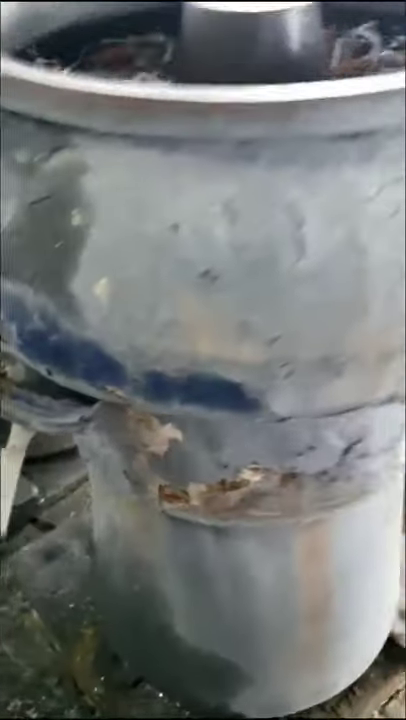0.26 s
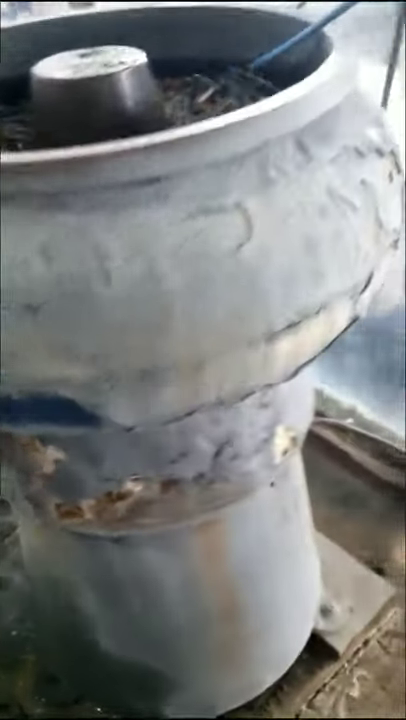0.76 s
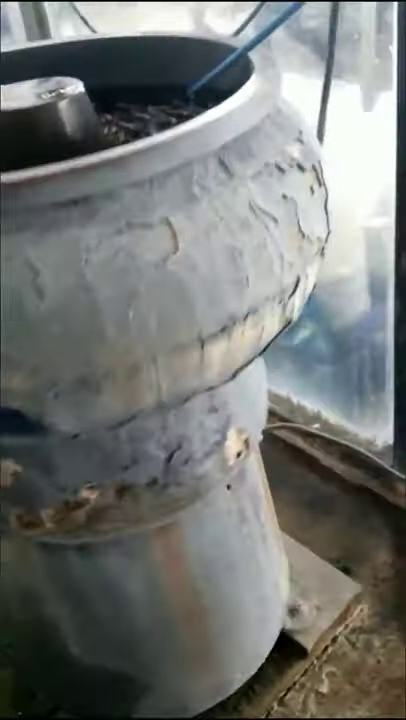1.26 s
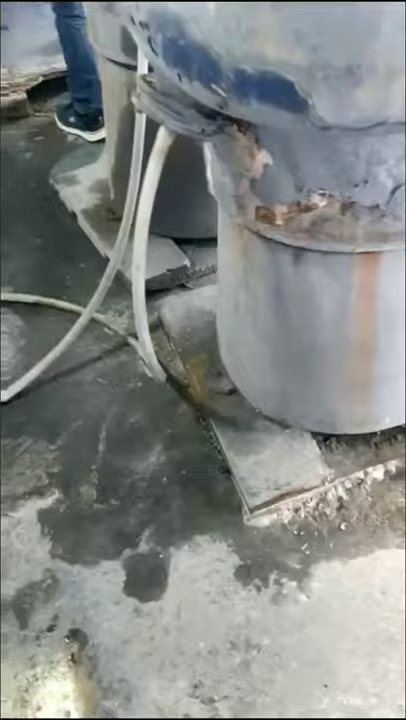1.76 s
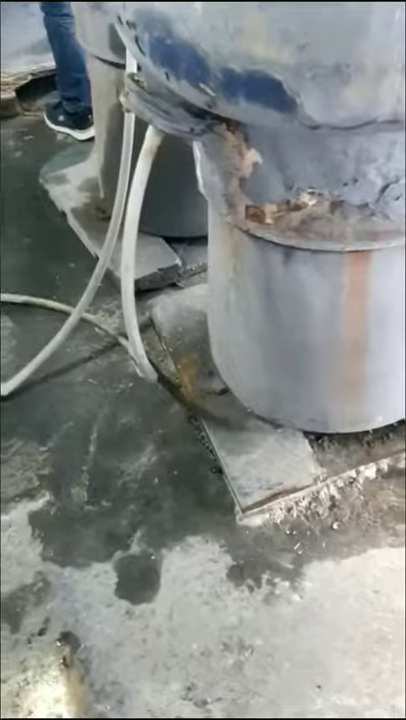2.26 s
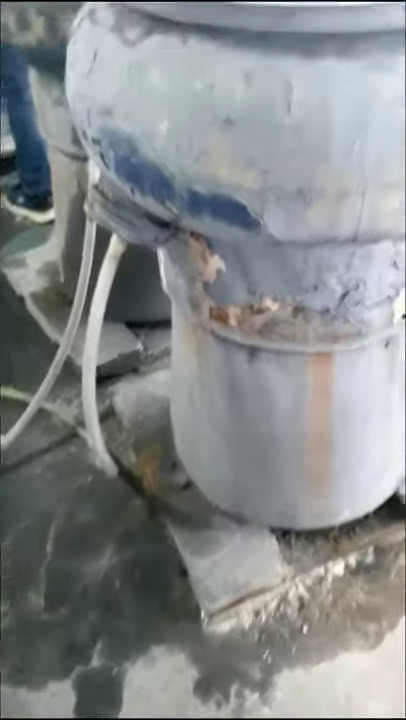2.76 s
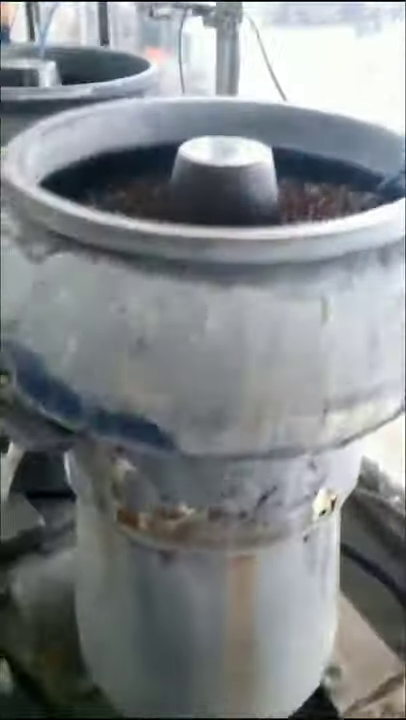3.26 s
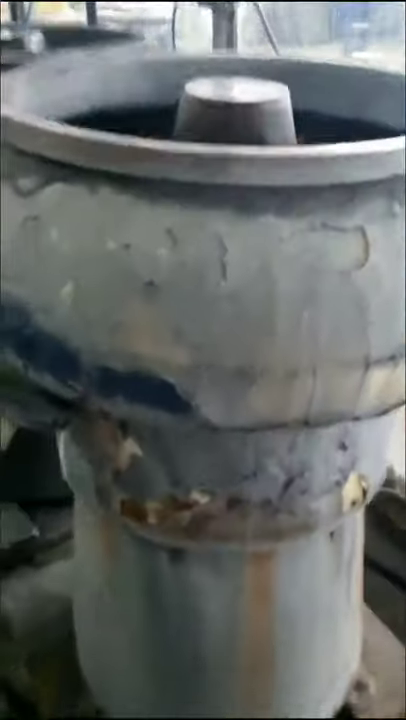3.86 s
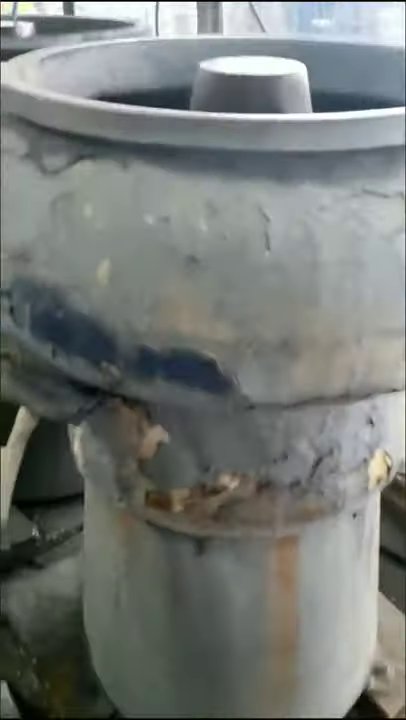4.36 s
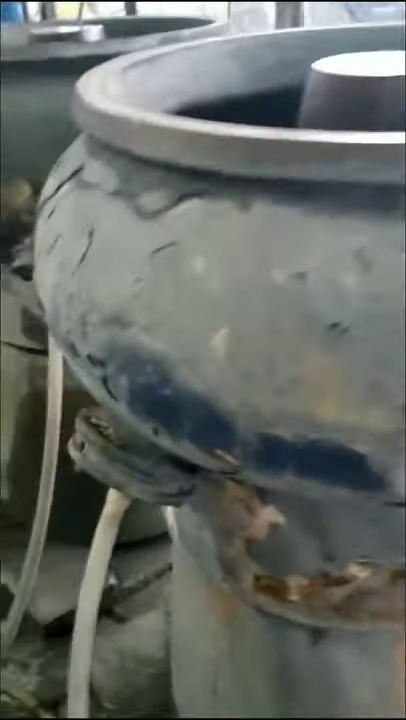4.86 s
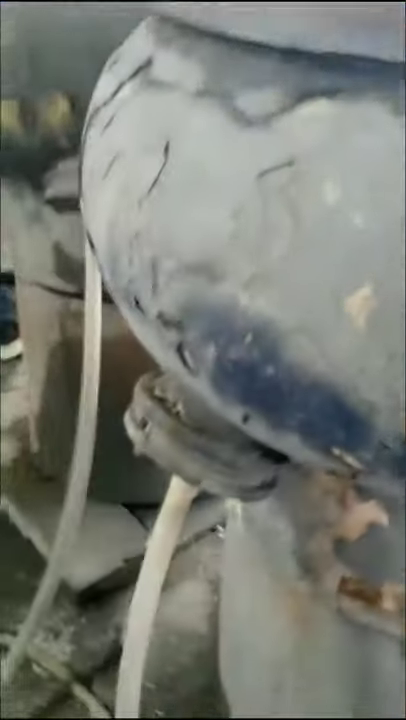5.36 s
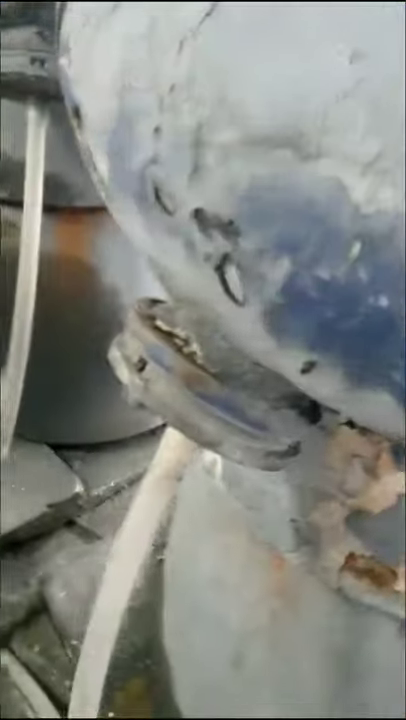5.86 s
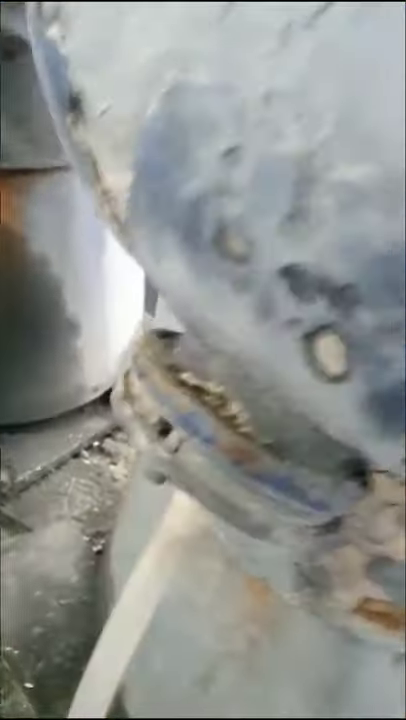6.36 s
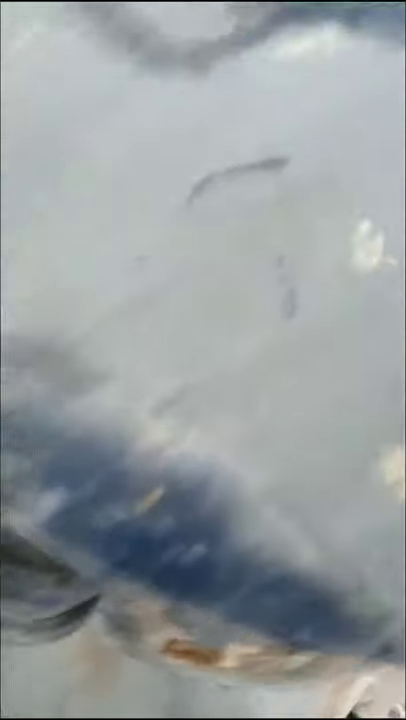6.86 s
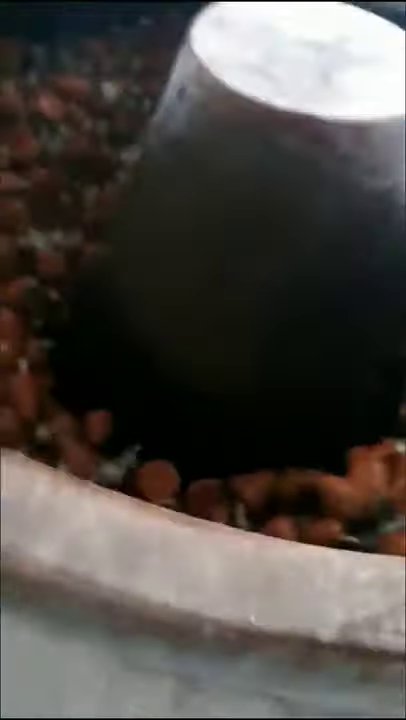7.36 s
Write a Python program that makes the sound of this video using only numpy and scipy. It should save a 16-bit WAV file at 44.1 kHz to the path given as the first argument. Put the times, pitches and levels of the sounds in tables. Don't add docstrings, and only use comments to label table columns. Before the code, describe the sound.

A vibratory polishing bowl runs with a dense, steady rushing rattle of chips and metal over a low wavering hum and dull irregular booms.

```python
import sys
import numpy as np
from scipy import signal
from scipy.fft import rfft, irfft, next_fast_len
from scipy.io import wavfile
from scipy.ndimage import uniform_filter1d

SR = 44100
rng = np.random.default_rng(int(sys.argv[2]) if len(sys.argv) > 2 else 0)


def gain_from_db(level_db):
    decades = np.asarray(level_db, float) / 20
    return 10 ** decades


def master_out(mix):
    frames = np.transpose(np.atleast_2d(mix))
    ceiling = np.clip(frames, -1, 1)
    pcm = np.round(ceiling * 32767).astype(np.int16)
    wavfile.write(sys.argv[1], SR, pcm)


N = 336042

CUT_S, RESUME_S = 1.4766, 1.6702
FRAME = 1024


def unit(x):
    return x / np.sqrt(np.mean(x ** 2))


def by_shot(pair):
    return np.where(np.arange(N) < (CUT_S + RESUME_S) / 2 * SR, *pair)


def walk(rate):
    hold = int(SR / rate)
    levels = np.repeat(rng.standard_normal(N // hold + 1), hold)
    return 1.38 * uniform_filter1d(uniform_filter1d(levels, hold), hold)[:N]


def shape(x, gain):
    size = next_fast_len(N)
    hz = np.arange(size // 2 + 1) * SR / size + 1e-3
    return irfft(rfft(x, size) * gain(hz), size)[:N]


def ring(hz, centre_hz, width_hz):
    return 1 / (1 + (2 * (hz - centre_hz) / width_hz) ** 2)


def colour(points, resonances):
    at, db = np.transpose(points)

    def gain(hz):
        base_db = np.interp(np.log(hz), np.log(at), db)
        return gain_from_db(base_db + sum(up_db * ring(hz, f, width) for f, width, up_db in resonances))
    return gain


def band(low_hz, high_hz):
    size = next_fast_len(N)
    spectrum = np.zeros(size // 2 + 1, complex)
    low, high = int(low_hz * size / SR), int(high_hz * size / SR)
    spectrum[low:high] = rng.standard_normal((high - low, 2)) @ [1, 1j]
    return unit(irfft(spectrum, size)[:N])


def bursts(rows, carriers=None):
    if carriers is None:
        carriers = [np.ones(N)] * len(rows)
    out = np.zeros(N)
    for (at, db, length), carrier in zip(rows, carriers):
        start = max(int((at - length / 2) * SR), 0)
        span = np.arange(start, min(int((at + length / 2) * SR), N))
        out[span] += gain_from_db(db) * np.cos(np.pi * (span / SR - at) / length) * carrier[span]
    return out


def phone_path():
    # (time [s], closeness to the shell [0-1], view over the rim [0-1])
    path = [
        (0, .1, 0.1),
        (1.45, .1, 0),
        (1.7, 0.1, 0),
        (3.0, 0.2, 0.2),
        (4.8, .3, 0.2),
        (6.2, 0.96, 0.03),
        (6.75, 1, 0),
        (7.05, .9, 0.6),
        (7.6, 1, 0.95),
    ]
    s, near, over = np.transpose(path)
    now = np.arange(N) / SR
    return np.interp(now, s, near), np.interp(now, s, over)


def hum(turn):
    # (first shot [dB], second shot [dB], neighbour share [0-1], in step at [s])
    multiples = [
        (-43, -42, 0.9, 4.7),
        (-43, -39, .8, 4.8),
        (-39.5, -40, 0.4, 3.9),
    ]
    close_db = [
        8,
        -0.5,
        -3.5,
    ]
    neighbour_slip_hz, first_in_step_s = 0.13, 0.46
    rim_db = -5
    s = np.arange(N) / SR
    near, over = phone_path()
    out = 0
    for k, (first_db, second_db, share, in_step_s) in enumerate(multiples):
        own = (k + 1) * turn + 0.23 * walk(0.93)
        slip = 2 * np.pi * (k + 1) * neighbour_slip_hz * (s - by_shot((first_in_step_s, in_step_s)))
        db = by_shot((first_db, second_db)) + close_db[k] * near + rim_db * over + 0.8 * walk(5)
        out = out + gain_from_db(db) * (np.sin(own) + share * np.sin(own - slip))
    for k, db in zip((4, 5, 6), (-48, -46, -44)):
        out = out + gain_from_db(db + 2.0 * walk(2.6)) * np.sin(k * turn)
    return np.sqrt(2) * out


def shell_mode(centre_hz, width_hz, swells, lulls_s, rest_db, near):
    noise = shape(rng.standard_normal(N), lambda hz: ring(hz, centre_hz, width_hz))
    mode = signal.hilbert(noise, next_fast_len(N))[:N]
    steadied = unit(np.real(mode / np.abs(mode) ** 0.8))
    lull_db = -11 * bursts([(at, 0, 0.12) for at in lulls_s])
    rest = gain_from_db(by_shot(rest_db) + 5 * near + 2 * walk(14))
    swell = bursts([(at, db, 1.43 * length) for at, db, length in swells])
    return np.hypot(rest, swell) * gain_from_db(lull_db) * steadied


def boom():
    # (time [s], level [dB], length [s])
    base_swells = [(0.14, -25, 0.07), (0.393, -30, 0.14), (0.628, -33.5, 0.19), (1.07, -47, 0.16),
                   (1.39, -35, 0.18), (1.704, -31, 0.07), (2.01, -29.5, 0.11), (2.356, -27.0, 0.12),
                   (2.726, -30, 0.14), (3.014, -33, 0.11), (3.163, -29, 0.12), (3.367, -27.0, 0.26),
                   (3.63, -30, 0.16), (4.0, -28, 0.06), (4.194, -26, 0.085), (4.415, -31, 0.1),
                   (4.574, -28, 0.13), (4.91, -34, 0.18), (5.163, -27, 0.13), (5.36, -30, 0.063),
                   (5.55, -39, 0.077), (5.73, -23, 0.044), (5.87, -32, 0.096), (6.25, -28, 0.28),
                   (6.56, -31.0, 0.11), (6.718, -35, 0.09), (6.854, -27, 0.13), (7.1, -28, 0.06),
                   (7.3, -32, 0.09), (7.472, -24, 0.079)]
    # (time [s], level [dB], length [s])
    bowl_swells = [(0.1, -25.5, .11), (.36, -26.5, 0.061), (.64, -29.5, .09), (.85, -34, 0.22),
                   (1.05, -30, 0.12), (1.29, -29, .07), (1.74, -27, 0.17), (1.91, -27, 0.09),
                   (2.07, -28.5, 0.11), (2.41, -26, 0.062), (2.51, -21.5, 0.068), (2.76, -31, 0.099),
                   (2.94, -23.5, 0.094), (3.25, -29, .15), (3.56, -29, 0.22), (4.04, -24, 0.047),
                   (4.25, -29.5, 0.18), (4.63, -22, 0.13), (4.97, -21.5, 0.084), (5.2, -23.5, .1),
                   (5.36, -28, 0.041), (5.73, -28, 0.09), (5.87, -20.5, .06), (5.96, -21, .06),
                   (6.54, -26, 0.09), (6.69, -22.5, 0.14), (6.89, -22, 0.14), (7.12, -19.5, 0.04),
                   (7.2, -19, 0.033), (7.31, -22, .092)]
    base_lulls_s = [.09, .2, .52, 1.84, 2.13, 2.85, 3.92, 4.78, 5.44, 6.0, 6.63, 7.03, 7.23]
    bowl_lulls_s = [.28, .52, 1.36, 2.3, 3.4, 3.72, 4.12, 4.82, 5.29, 6.06, 7.5]
    near, _ = phone_path()
    base = shell_mode(180, 14, base_swells, base_lulls_s, (-36.5, -38.5), near)
    bowl = shell_mode(232, 11.6, bowl_swells, bowl_lulls_s, (-39, -33), near)
    return base + bowl


def chimes():
    # (frequency [Hz], width [Hz], level [dB])
    parts = [
        (735, 70, -43),
        (1122, 46, -40),
        (1354, 70, -39),
        (1836, 70, -39),
        (2950, 160, -45),
    ]
    # (time [s], which part [index], level over usual [dB], length [s])
    surfacing = [(1.96, 2, 5, .2), (2.01, 0, 6, .3), (2.3, 1, 4, .3), (2.31, 2, 2, .2), (2.6, 3, 4.5, .6),
                 (2.86, 1, 4, .5), (3.05, 2, 5, .5), (3.74, 3, 3.5, .25), (4.15, 3, 2, .35),
                 (4.54, 0, 8, .5), (5.2, 2, 5, .36), (5.8, 0, 4, .4), (6.05, 4, 7, .4), (6.56, 1, 5, .5),
                 (6.62, 2, 5, .5)]
    sunk_db = -2.5
    out = 0
    for k, (hz, width, db) in enumerate(parts):
        rows = [(at, up_db, length) for at, which, up_db, length in surfacing if which == k]
        surfaced = np.hypot(gain_from_db(sunk_db), bursts(rows))
        out = out + surfaced * gain_from_db(db + 2.0 * walk(7)) * band(hz - width / 2, hz + width / 2)
    return out * (np.arange(N) > CUT_S * SR)


def clunks():
    # (time [s], frequency [Hz], level [dB], length [s])
    knocks = [
        (1.16, 325, -28.5, 0.06),
        (6.63, 570, -31.5, 0.032),
        (7.005, 530, -28.5, 0.05),
        (7.05, 360, -32, .04),
        (7.228, 507, -28.5, 0.032),
        (7.23, 410, -31, .03),
    ]
    s = np.arange(N) / SR
    tones = [np.sqrt(2) * np.sin(2 * np.pi * hz * s + 1.3 * walk(40)) for _, hz, _, _ in knocks]
    return bursts([(at + length / 2, db, 2 * length) for at, _, db, length in knocks], tones)


def impacts(turn):
    hits_per_s, scatter_db, shake_depth = 30000, 1.2, 0.05
    struck = rng.random(N) < hits_per_s / SR
    strength = gain_from_db(scatter_db * rng.exponential(size=N)) * rng.standard_normal(N)
    return unit(struck * strength * (1 + shake_depth * np.sin(turn)))


def rattle(turn):
    # (frequency [Hz], level per Hz [dB])
    spectra = [
        [(24, -32), (40, -10), (127, -12), (206, -5), (508, -8.5), (625, -9), (884, -11), (1250, -7.5),
         (1980, -10), (3540, -9.5), (5240, -15), (7240, -22), (10000, -30), (13300, -33)],
        [(24, -37), (40, -15.5), (119, -11.5), (228, -7), (427, -14), (709, -10.5), (1020, -13), (2100, -13),
         (3500, -12.5), (5660, -14), (7300, -21.5), (10400, -24.5), (11300, -29), (12700, -37)],
    ]
    # (frequency [Hz], width [Hz], level over the rattle [dB])
    resonances = [
        [(318, 14, 3.5), (634, 48, 6), (710, 21, 2.5), (1273, 240, 0), (1560, 85, 1.5), (2720, 470, -1),
         (3530, 240, -0.5), (6150, 450, 4.5), (8800, 400, 4), (10700, 330, 7), (11730, 260, 9),
         (12110, 160, -10), (12470, 300, 12), (11370, 250, -4)],
        [(338.4, 14, 4), (563, 61, 3), (755, 27, 1), (870, 300, -2), (1164, 30, 4), (1303, 150, 2.5),
         (1720, 190, 2), (2900, 340, 1.5), (3510, 130, 1), (4290, 140, 2)],
    ]
    level_db, near_db, over_db = (-21.3, -21.0), -0.4, -1
    rim_top_db, rim_shadow_db = 4.5, -3
    knocks = impacts(turn) + gain_from_db(1.5) * rng.standard_normal(N)
    first = by_shot((True, False))
    near, over = phone_path()
    out = np.zeros(N)
    for shot, points, peaks in zip((first, ~first), spectra, resonances):
        tone = shape(knocks, colour(points, peaks))
        wall = shape(tone, lambda hz: 1 / (1 + (hz / 950) ** 6))
        top = shape(tone, lambda hz: 1 / (1 + (5800 / hz) ** 8))
        middle = tone - wall - top
        scale = 1 / np.std(middle)
        shadowed = shape(tone, lambda hz: np.exp(-((hz - 2400) / 550) ** 2))
        middle = middle + shadowed * (gain_from_db(rim_shadow_db * over) - 1)
        wall = wall * gain_from_db(0.75 * walk(9))
        top = top * gain_from_db(rim_top_db * over + 0.5 * walk(12))
        out += shot * scale * (wall + middle * gain_from_db(0.31 * walk(10)) + top)
    return out * gain_from_db(by_shot(level_db) + near_db * near + over_db * over)


def scene():
    shaft_hz = 29.66
    turn = 2 * np.pi * np.cumsum(shaft_hz * (1 + 0.0027 * walk(0.643))) / SR
    mono = hum(turn) + boom() + chimes() + clunks() + rattle(turn)
    return np.array([mono, mono])


def starve(x, grid, steps, sway_db):
    rise = np.cumsum(np.kaiser(FRAME + 1, 4 * np.pi))
    window = np.sqrt(np.r_[rise[:FRAME], rise[FRAME - 1::-1]] / rise[-1] * 2 / FRAME)
    times = np.arange(2 * FRAME) + (FRAME + 1) / 2
    lines_at = np.arange(FRAME) + 0.5
    basis = window[:, None] * np.cos(np.pi / FRAME * np.outer(times, lines_at))
    basis = basis.astype(np.float32)
    lead = 2 * FRAME - grid
    hops = np.pad(x, (lead, -(N + lead) % FRAME + FRAME)).reshape(-1, FRAME)
    lines = np.hstack([hops[:-1], hops[1:]]).astype(np.float32) @ basis
    hz = lines_at * SR / 2 / FRAME
    first = (np.arange(len(lines)) * FRAME - lead) / SR < CUT_S
    step_db = np.where(first[:, None], *[np.interp(hz, *np.transpose(points)) for points in steps])
    groups = np.repeat(rng.standard_normal((len(lines), 32)), FRAME // 32, axis=1)
    step = gain_from_db(step_db + sway_db * (rng.standard_normal((len(lines), 1)) + groups))
    rounded = np.sign(lines) * np.floor(np.abs(lines) / step + 0.4) * step
    back = rounded.astype(np.float32) @ basis.T
    return (back[:-1, FRAME:] + back[1:, :FRAME]).ravel()[lead - FRAME:][:N]


def splash():
    rows = [(RESUME_S + 0.003, -47, 0.006), (RESUME_S + 0.008, -50, 0.004), (RESUME_S + 0.0185, -54, 0.004)]
    return bursts(rows, [band(11000, 16000)] * len(rows))


def slips():
    # (time [s], low edge [Hz], high edge [Hz], level [dB])
    partings = [(2.285, 6200, 8400, -38), (2.565, 6800, 8370, -39), (2.775, 6880, 9000, -39),
                (3.82, 4600, 6000, -34), (3.82, 6800, 8800, -40), (4.075, 7500, 8900, -38),
                (4.375, 9000, 10500, -43), (4.865, 5500, 7600, -36), (6.675, 6230, 7600, -37),
                (7.235, 4280, 5400, -32), (7.235, 6200, 7800, -38)]
    rows = [(at, db, 0.046) for at, _, _, db in partings]
    return bursts(rows, [band(low, high) for _, low, high, _ in partings])


def band_limit(x):
    return signal.sosfilt(signal.butter(12, 16000, fs=SR, output="sos"), x)


def record(dry):
    # (frequency [Hz], level [dB])
    coarse = [
        [(200, -45), (5000, -30), (7500, -20.5), (10000, -20.5), (13200, -21), (13250, 20)],
        [(200, -45), (5000, -29), (8000, -20), (11700, -20), (12600, -19), (12700, 20)],
    ]
    # (frequency [Hz], level [dB])
    fine = [[(200, -70), (6000, -52), (13300, -50), (13350, 20)]] * 2
    s = np.arange(N) / SR
    mono = np.tanh(0.9 * dry[0]) / 0.9
    mono = starve(mono, 60, coarse, sway_db=1.4)
    mono = starve(mono, 423, fine, sway_db=2.0)
    mono = mono * (np.clip((CUT_S - s) / 0.0012, 0, 1) + (s >= RESUME_S))
    mono = mono + splash()
    side = slips()
    return band_limit(np.array([mono + side, mono - side]))


dry = scene()
out = record(dry)
master_out(out)
```